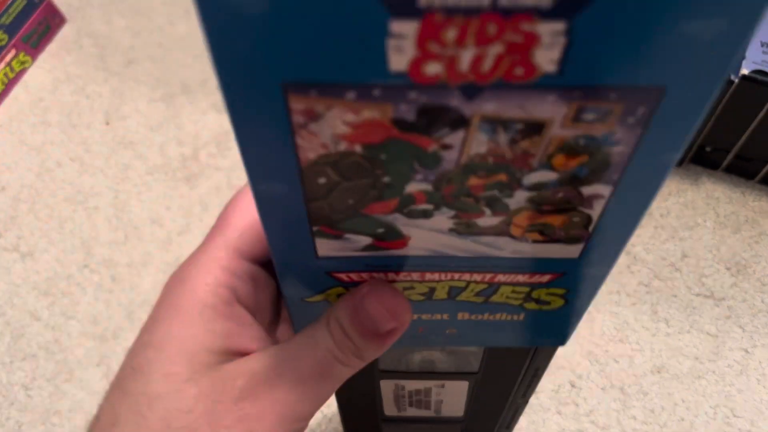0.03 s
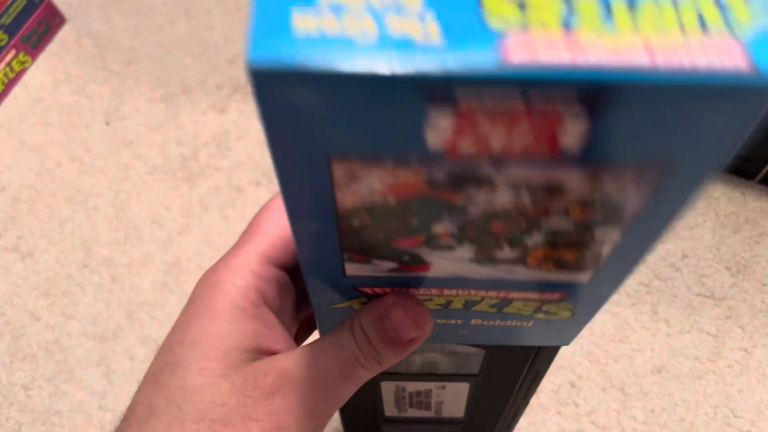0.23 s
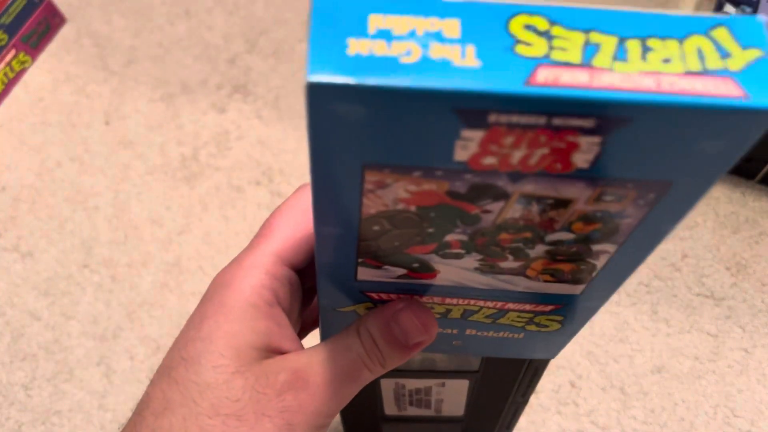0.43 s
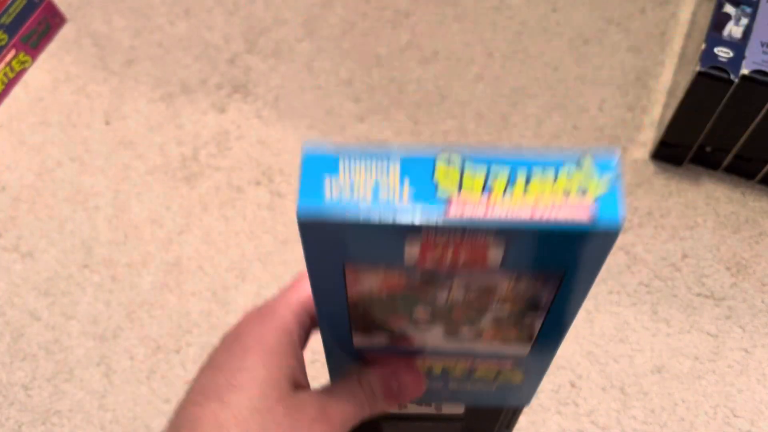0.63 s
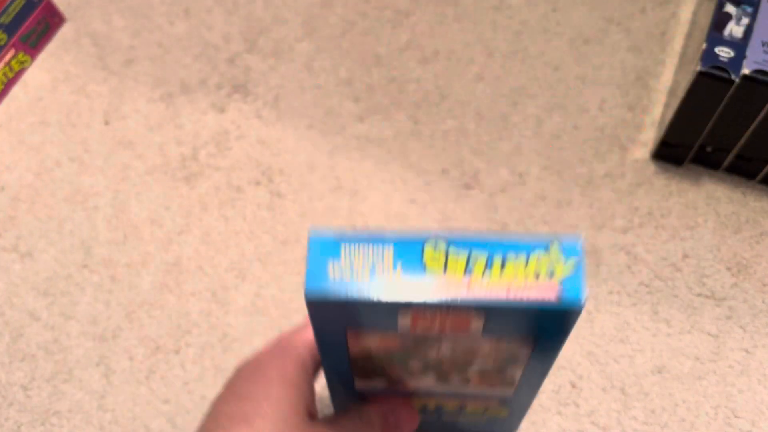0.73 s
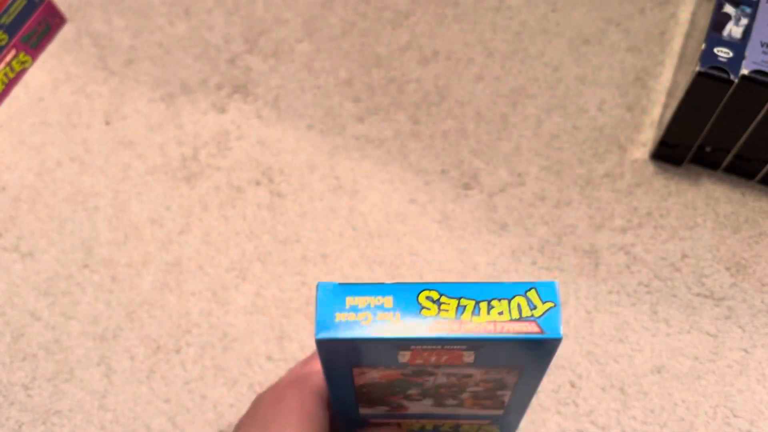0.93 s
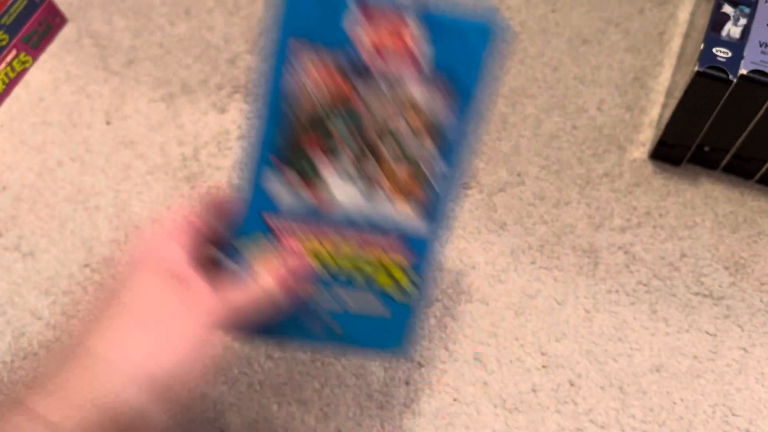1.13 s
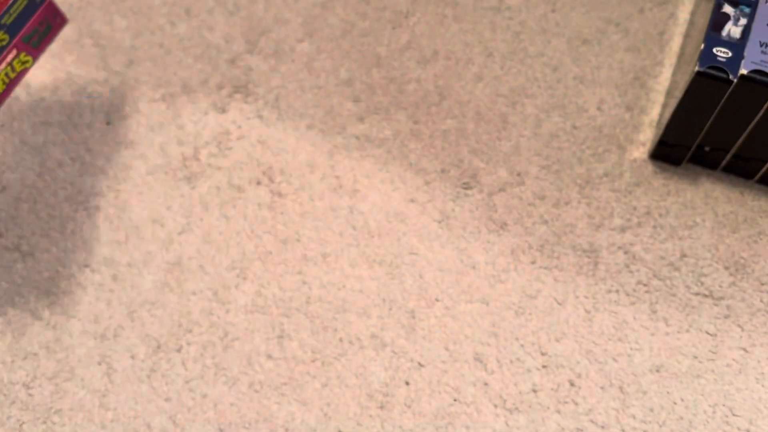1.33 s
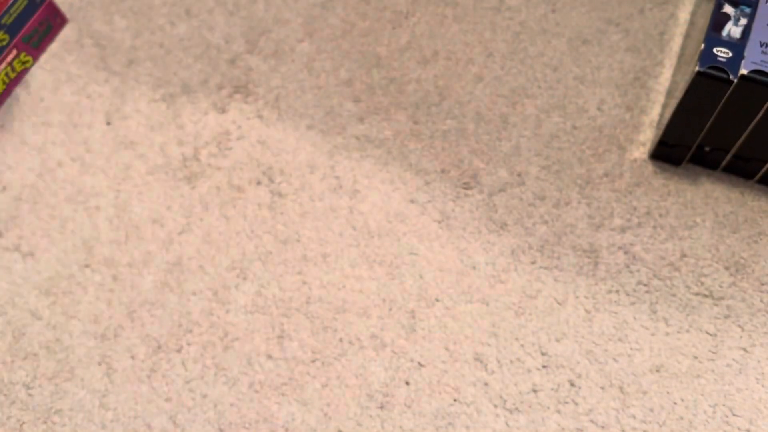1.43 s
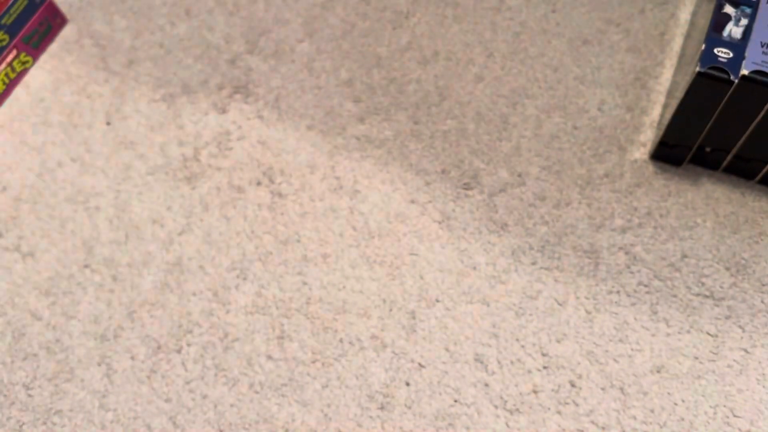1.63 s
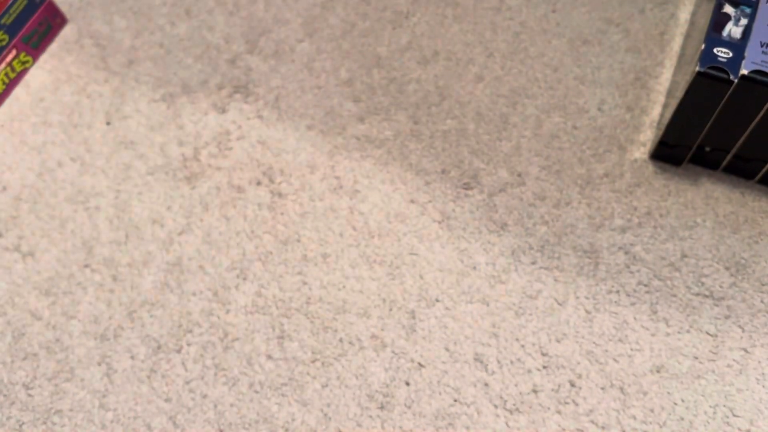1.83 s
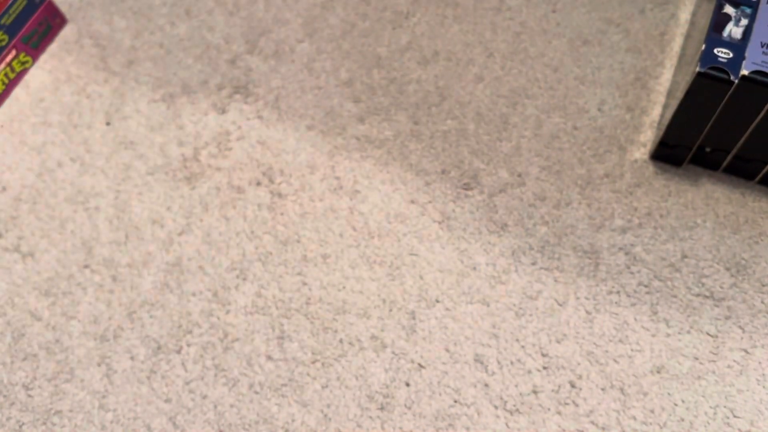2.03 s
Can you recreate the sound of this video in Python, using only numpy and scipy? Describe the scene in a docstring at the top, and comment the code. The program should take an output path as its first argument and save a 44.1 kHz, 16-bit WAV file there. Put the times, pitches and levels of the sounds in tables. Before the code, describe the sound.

Close to the microphone in a small, quiet room, a video cassette knocks loose and slides hissing from its card sleeve with a snap. Light finger taps follow before it falls over, clattering and thudding on the carpet.

```python
"""A small carpeted room, a stereo microphone close to a plastic video cassette in its cardboard sleeve.
At 0.2 s the cassette jolts loose, then rubs along the card, rasp turning to hiss, and snaps clear at
0.8 s. Fingers brush and tick on the empty sleeve. From 1.66 s the cassette topples with a rattle,
landing on the carpet with a thud at 1.8 s. The room's low rumble lies underneath throughout."""
import sys
import numpy as np
from scipy import signal
from scipy.fft import rfft, irfft
from scipy.io import wavfile
from scipy.ndimage import uniform_filter1d

SR = 44100
rng = np.random.default_rng(int(sys.argv[2]) if len(sys.argv) > 2 else 0)


def bounce(signal):
    """Save signal as a 16-bit WAV file at the path given by the first command-line argument."""
    frames = np.transpose(np.atleast_2d(signal))
    limited = np.clip(frames, -1, 1)
    pcm = np.round(limited * 32767).astype(np.int16)
    wavfile.write(sys.argv[1], SR, pcm)


N = 92610

# Cassette against sleeve and floor, close up: (time [s], contact length [ms], floor thud [dB],
# hollow body [dB], panels [dB], shell crack [dB], crack tilt [dB/octave], left over right [dB])
KNOCKS = [(0.1991, 6, -68, -71, -41.5, -50, 0.5, 1.5), (.203, 11.4, -52, -68.5, -39.5, -40.5, -2, -0.5),
          (0.2144, 11, -35.5, -63, -26.5, -53, -5, 2), (0.2339, 4, -51, -38.5, -37, -43, -25, 12),
          (.247, 4.3, -60, -35.5, -62, -50.5, 3, 1), (0.668, 9, -68.5, -52.5, -41.5, -38, -2, 5.5),
          (0.718, 5, -62, -87, -50.5, -43, 1, .5), (.799, 3.5, -67.5, -57.5, -37.5, -33, 9, 1),
          (0.8015, 1.3, -55, -37.5, -35, -28, -1.5, 3), (1.659, 7, -51, -47, -51.5, -59.5, -1, 14),
          (1.690, 3.2, -73.5, -48.5, -51, -43, 3.5, 2.5), (1.697, 10.5, -80, -43.5, -41, -41.5, -0.5, 9),
          (1.761, 7, -65.5, -47, -51.5, -49.5, 6.5, 6.5), (1.7925, 3.1, -50.5, -54, -33, -37.5, 2, 11.5),
          (1.7972, 9.5, -37, -27.5, -51.5, -44.5, 0.5, -12), (1.807, 8.4, -36, -40.5, -43, -40.5, -1, 5)]
# Modes of the hollow body, flat panels and plastic shell: (frequency [Hz], level [dB], t60 [s])
HOLLOW_MODES = [(221.4, 0.5, 0.07), (275, 0, 0.12), (342, -3, 0.072), (472.2, 1, 0.071), (587, -3.5, .04)]
PANEL_MODES = [(599, -2.5, 0.05), (705, 2, .05), (828, 6, 0.03), (1003, 14.5, 0.017), (1132, -1.5, 0.079),
               (1410, 8.5, 0.013)]
SHELL_MODES = [(1568, 3, 0.031), (2153, -1.5, 0.045), (2400, -5, .02), (2930, -5, 0.022), (3050, 8.5, .015),
               (3380, -2.5, .02), (3810, -2, 0.034), (4180, -4, .018), (4600, 1.5, .012),
               (5130, 3.5, 0.0095), (5790, 2, .018), (6600, 2.5, 0.004), (7700, 8, .01), (8490, 1.5, 0.018)]
# Spectrum of cracking plastic, before each knock's tilt: (frequency [Hz], level [dB])
CRACK_SPECTRUM = [(300, -9), (1000, 0.5), (1500, -2), (2000, 5.5), (3300, 5), (5000, 0), (8000, -7.5),
                  (11000, -7.5), (15500, -14)]
THUD_HZ, THUD_T60_S = 63, 0.12
RATTLE_SHARE, RATTLE_DECAY_S = 0.025, 0.0087

def cassette_knocks(t):
    """Each blow pushes floor, body and panels; its crunch of tiny contacts rings panels and shell."""
    def push(seconds):
        return np.gradient(t * np.exp(-t / seconds))
    out = np.zeros((2, N))
    for start, contact_ms, thud_db, hollow_db, panel_db, crack_db, tilt_db, pan_db in KNOCKS:
        age = t / (contact_ms / 1000)
        contact = age * np.exp(-2.4 * age)
        rattle = RATTLE_SHARE * np.exp(-t / RATTLE_DECAY_S)
        crunch = unit(grains(per_s=16000, spread_db=2) * (contact + rattle))
        thud = ring(push(seconds=0.001), [(THUD_HZ, 0, THUD_T60_S)])
        hollow = ring(push(seconds=0.00045), HOLLOW_MODES)
        panel = unit(ring(push(seconds=0.00034), PANEL_MODES))
        panel += 1.4 * unit(ring(crunch, PANEL_MODES))
        crack = unit(colour(crunch, curve(CRACK_SPECTRUM)))
        crack += undb(-4) * unit(ring(crunch, SHELL_MODES))
        crack = colour(crack, undb(tilt_db * np.log2(np.maximum(freqs(), 1500))))  # tilt above 1.5 kHz
        add(out, burst(thud, thud_db) + burst(hollow, hollow_db), start)
        add(out, burst(panel, panel_db) + burst(crack, crack_db), start, pan_db)
    return out


# Friction on the way out of the sleeve, just left of centre: (time [s], rasp [dB], hiss [dB])
SLIDE_LEVELS = [(.2, -56, -51), (.255, -52.5, -61.5), (.285, -59, -62.5), (.35, -59.5, -61),
                (.385, -55, -59.5), (.44, -50, -58), (.49, -49.5, -59), (.56, -51.5, -57.5),
                (.612, -51.5, -44), (.65, -61.5, -50), (.69, -48.5, -40), (.73, -54, -45.5),
                (.797, -54.5, -46.5), (.815, -71.5, -66), (.9, -94, -91)]
# Spectra of the card's hollow rasp and of the hiss: (frequency [Hz], level [dB])
RASP_SPECTRUM = [(100, -9), (250, -20), (350, -14), (460, -3.5), (650, 1), (850, -4.5), (1120, 1.5),
                 (1300, -10), (1530, 0), (1800, -15), (3000, -17), (8000, -36.5)]
HISS_SPECTRUM = [(400, -24.5), (1500, 2.5), (2400, -7), (3400, 2.5), (4600, -4), (6000, -3.5), (8000, 0),
                 (11000, -7), (15500, -3)]

def cassette_slide(t):
    """Plastic rubs along card: a hollow rasp gives way to hiss as the cassette nears the opening."""
    times, rasp_db, hiss_db = np.array(SLIDE_LEVELS).T
    rasp = unit(colour(friction(), curve(RASP_SPECTRUM))) * undb(np.interp(t, times, rasp_db))
    rubbing = friction()
    shell = undb(-10) * unit(ring(rubbing, SHELL_MODES))
    hiss = unit(colour(rubbing, curve(HISS_SPECTRUM)))
    hiss = unit(hiss + shell) * undb(np.interp(t, times, hiss_db))
    sliding = (t > times[0]) & (t < times[-1])
    out = np.zeros((2, N))
    add(out, (rasp + hiss) * sliding, start=0, pan_db=1.1)
    return out


# Fingers and edges catching, centre to left of the microphone:
# (time [s], level [dB], centre [Hz], sharpness [Q], left over right [dB])
TICKS = [(0.9691, -59, 8240, 0.72, 0.5), (1.2467, -57, 4700, 1.8, 6.5), (1.288, -56.5, 3120, 1.26, 6),
         (2.029, -76.5, 7900, 1.3, 4), (2.091, -62.5, 3020, 0.34, 5.5)]
TICK_DECAY_S, TICK_TOP_HZ, TICK_BODY_DB = 0.0028, 9600, -8

def finger_ticks(t):
    """Single dry clicks faintly stir the panels and the hollow of the sleeve."""
    out = np.zeros((2, N))
    for start, db, hz, q, pan_db in TICKS:
        click = rng.standard_normal(N) * np.exp(-t / TICK_DECAY_S)
        body = burst(ring(click, HOLLOW_MODES + PANEL_MODES), db + TICK_BODY_DB)
        tone = resonance(hz, q) ** 2 / np.hypot(1, (freqs() / TICK_TOP_HZ) ** 2)
        add(out, burst(colour(click, tone), db) + body, start, pan_db)
    return out


# Strokes of skin on card, a little to the left: (time [s], length [s], level [dB])
BRUSHES = [(0.025, 0.05, -76.5), (0.857, 0.24, -69.5), (0.964, 0.051, -55.5), (1.009, 0.058, -62),
           (1.072, 0.11, -61), (1.138, 0.057, -59.5), (1.663, 0.055, -65.5), (1.716, 0.072, -53)]
# Spectrum of that brushing: (frequency [Hz], level [dB])
BRUSH_SPECTRUM = [(200, -13.5), (1200, -10.5), (2000, -15.5), (3500, -6), (6000, -7.5), (8000, -4.5),
                  (11000, -20.5), (15500, -7)]
# The sleeve giving in the hand, dead centre: (time [s], length [s], level [dB], centre [Hz])
FLEXES = [(.135, 0.06, -62, 65), (.255, 0.064, -58.5, 176), (0.277, 0.069, -55, 80),
          (0.309, .034, -56, 190), (.815, .08, -58.5, 90), (1.655, 0.014, -51.5, 140),
          (1.83, 0.04, -57.5, 170)]

def sleeve_handling(t):
    """Skin brushes lightly over the card, and the sleeve flexes with a dull, low sound."""
    out = np.zeros((2, N))
    for start, length, db in BRUSHES:
        brush = unit(colour(friction(), curve(BRUSH_SPECTRUM)))
        add(out, brush * stroke(t, length) * undb(db), start, pan_db=4)
    for start, length, db, hz in FLEXES:
        flex = colour(grains() * stroke(t, length), resonance(hz, q=1) ** 2)
        add(out, burst(flex, db, seconds=length), start)
    return out


# Colour of the reflections from right beside the microphone: (frequency [Hz], level [dB])
NEAR_SPECTRUM = [(60, -10.5), (130, -3.5), (300, 1), (1000, -2), (3500, 0), (7000, -1), (10000, -18)]
NEAR_DB, NEAR_T60_S = -6.5, 0.018

def near_reflections(dry, t):
    """Dense early reflections off hand, floor and shelf, in opposite polarity left and right."""
    echo = unit(rng.standard_normal(N) * decay(t, NEAR_T60_S)) / np.sqrt(N)
    echo = colour(echo, curve(NEAR_SPECTRUM))
    side = undb(NEAR_DB) * signal.fftconvolve(dry.mean(axis=0), echo)[:N]
    return np.array([side, -side])


# What the room sends back to the microphone: (frequency [Hz], level [dB])
ECHO_SPECTRUM = [(50, -20), (200, -16), (600, -8.5), (1500, -12), (4000, -12), (8000, -16.5),
                 (15500, -22.5)]
LOW_T60_S, TREBLE_T60_S, ECHO_DELAY_S = 0.18, 0.2, 0.0016

def room_echo(dry, t):
    """The short echo of a carpeted room, lasting slightly longer above 2 kHz."""
    def tail():
        low_band = 1 / np.hypot(1, freqs() / 2000)
        low = colour(rng.standard_normal(N), low_band) * decay(t, LOW_T60_S)
        treble = colour(rng.standard_normal(N), np.sqrt(1 - low_band ** 2)) * decay(t, TREBLE_T60_S)
        onset = np.clip(t / ECHO_DELAY_S - 1, 0, 1)
        return colour(unit((low + treble) * onset) / np.sqrt(N), curve(ECHO_SPECTRUM))
    return signal.fftconvolve(dry.mean(axis=0)[None], diffuse(tail(), tail()), axes=1)[:, :N]


# The quiet room all around the microphone: (frequency [Hz], level [dB])
ROOM_TONE_SPECTRUM = [(20, -23), (45, -3.5), (68, 0), (100, -7.5), (160, -19.5), (300, -22.5), (700, -30),
                      (1400, -28.5), (2000, -39.5), (8000, -45), (15500, -59)]
ROOM_TONE_DB = -68.5

def room_tone():
    """Steady low rumble and faint hiss of the room."""
    mid, side = (unit(colour(rng.standard_normal(N), curve(ROOM_TONE_SPECTRUM))) for _ in range(2))
    return undb(ROOM_TONE_DB) * diffuse(mid, side)


def grains(per_s=7000, spread_db=1.5):
    """Tiny catches of rough surfaces: random clicks, mostly small."""
    hit = rng.random(N) < per_s / SR
    return hit * rng.choice([-1, 1], N) * undb(spread_db * np.minimum(rng.exponential(size=N), 4))


def friction(judder_hz=90, judder_db=2.95):
    """A sliding contact: tiny catches whose strength judders with the uneven pressure."""
    catches = grains()
    hold = int(SR / judder_hz)
    steps = np.repeat(rng.standard_normal(N // hold + 1), hold)
    pressure = unit(uniform_filter1d(steps, hold)[:N])
    return catches * undb(judder_db * pressure)


def ring(x, modes, scatter_db=1.5):
    """Drive damped modes; their strengths vary at random, as with the point of contact."""
    t = np.arange(N // 4) / SR
    scatter = scatter_db * rng.standard_normal(len(modes))
    response = sum(undb(db + offset_db) * np.sin(2 * np.pi * hz * t) * decay(t, t60)
                   for (hz, db, t60), offset_db in zip(modes, scatter))
    return signal.fftconvolve(x, response)[:N]


def stroke(t, length):
    """Rounded swell of one short movement."""
    return np.sqrt(np.maximum(np.sin(np.pi * np.minimum(t / length, 1)), 0))


def decay(t, t60):
    """Fall by 60 dB every t60 seconds."""
    return np.exp(-np.log(1000) * t / t60)


def undb(db):
    """Decibels to gain."""
    return 10 ** (np.asarray(db) / 20)


def unit(x):
    """Scale to rms 1."""
    return x / np.sqrt(np.mean(x ** 2))


def burst(x, db, seconds=0.01):
    """Scale a short sound to the energy of this level held for this long."""
    return x * undb(db) * np.sqrt(SR * seconds / np.sum(x ** 2))


def freqs():
    """Frequency of each spectral bin."""
    return np.maximum(np.fft.rfftfreq(N, 1 / SR), 1)


def curve(points):
    """Gain per bin from (frequency [Hz], level [dB]) points."""
    hz, db = np.array(points).T
    return undb(np.interp(np.log(freqs()), np.log(hz), db))


def resonance(hz, q):
    """Gain per bin of one broad resonance."""
    return 1 / np.hypot(1, q * (freqs() / hz - hz / freqs()))


def colour(x, gain):
    """Minimum-phase filter with the given gain per bin."""
    cepstrum = irfft(np.log(gain + 1e-9), N)
    cepstrum[1:N // 2] *= 2
    cepstrum[N // 2 + 1:] = 0
    return irfft(rfft(x, N) * np.exp(rfft(cepstrum)), N)


def add(out, x, start, pan_db=0):
    """Mix a sound in at a time and a position; positive pan is to the left."""
    i = int(start * SR)
    gains = undb(np.array([[pan_db], [-pan_db]]) / 2)
    out[:, i:] += x[:N - i] * gains / gains.mean()


def diffuse(mid, side, wide_above_hz=250):
    """Sound from all around: alike left and right in the bass, wider in the treble."""
    side = 0.5 * colour(side, freqs() / np.hypot(freqs(), wide_above_hz))
    return np.array([mid + side, mid - side])


def scene():
    """Cassette and sleeve close up, their echoes and the quiet room behind."""
    t = np.arange(N) / SR
    close = cassette_knocks(t) + finger_ticks(t) + cassette_slide(t) + sleeve_handling(t)
    return close + near_reflections(close, t) + room_echo(close, t) + room_tone()


# Response of the microphone's left port: (frequency [Hz], level [dB])
LEFT_PORT_RESPONSE = [(100, 0), (700, -1), (4400, 1), (8000, -2), (15000, -3)]
LAG_FROM_HZ, HZ_PER_CYCLE = 7580, 3950
LOW_CUT_HZ, HIGH_CUT_HZ = 35, 16000

def record(dry):
    """The microphone: its left port is coloured and lags in the treble; deep bass and top are cut."""
    lag_cycles = np.maximum(freqs() - LAG_FROM_HZ, 0) / HZ_PER_CYCLE
    left = irfft(rfft(dry[0]) * curve(LEFT_PORT_RESPONSE) * np.exp(-2j * np.pi * lag_cycles), N)
    low_cut = signal.butter(2, LOW_CUT_HZ, "high", fs=SR, output="sos")
    high_cut = signal.ellip(8, 0.2, 70, HIGH_CUT_HZ, fs=SR, output="sos")
    return signal.sosfilt(high_cut, signal.sosfilt(low_cut, np.array([left, dry[1]])))


dry = scene()
out = record(dry)
bounce(out)
```